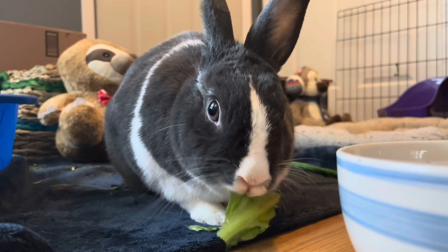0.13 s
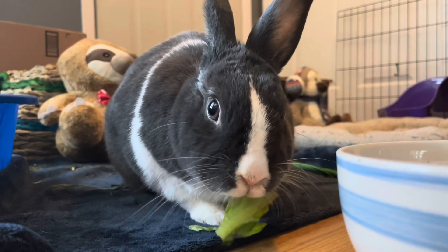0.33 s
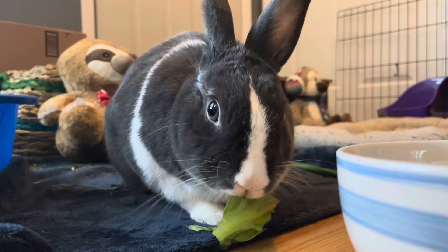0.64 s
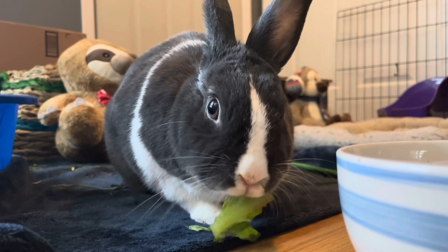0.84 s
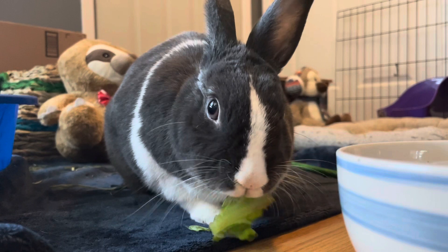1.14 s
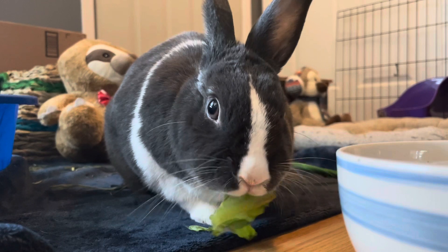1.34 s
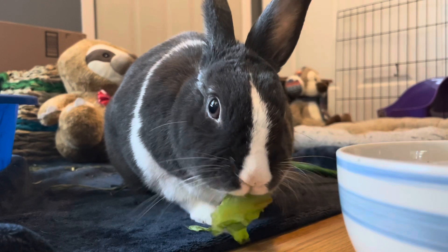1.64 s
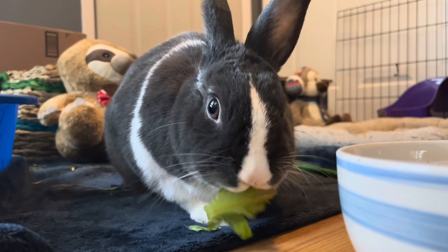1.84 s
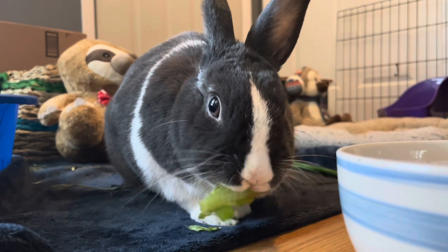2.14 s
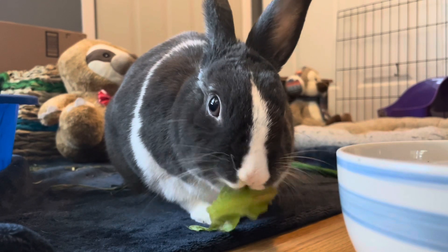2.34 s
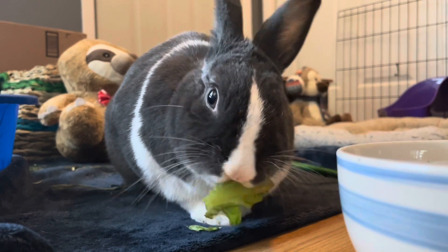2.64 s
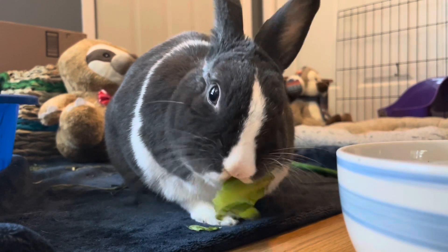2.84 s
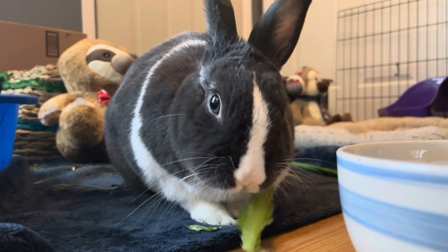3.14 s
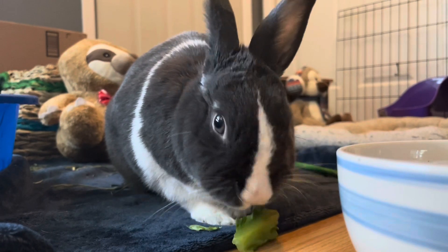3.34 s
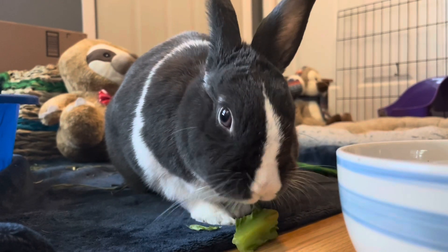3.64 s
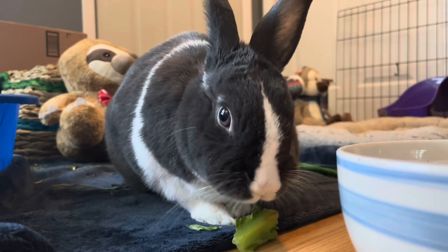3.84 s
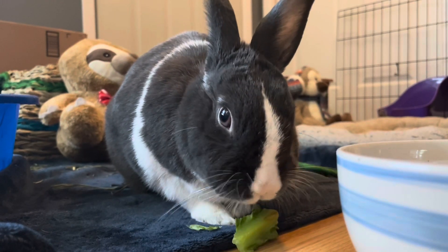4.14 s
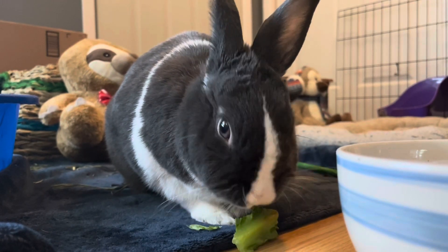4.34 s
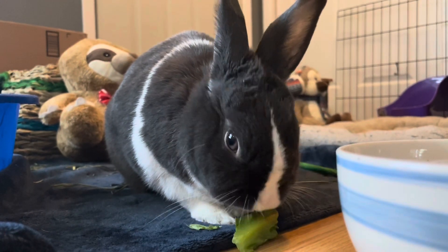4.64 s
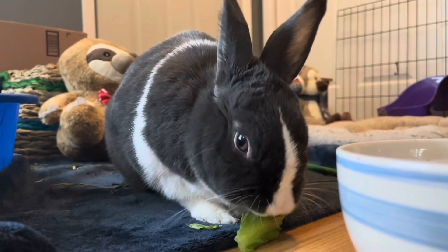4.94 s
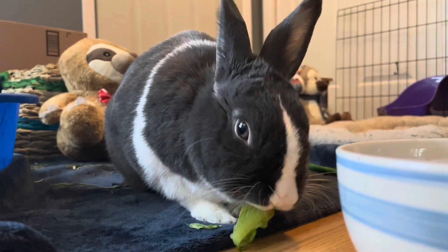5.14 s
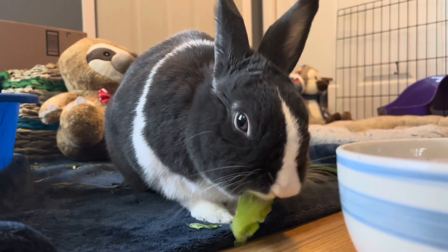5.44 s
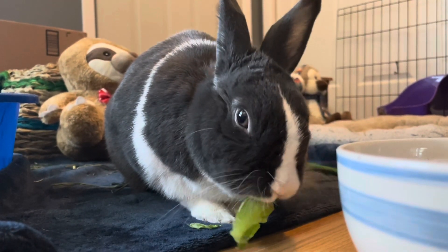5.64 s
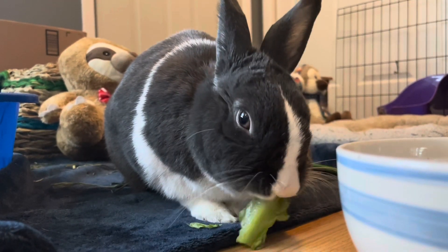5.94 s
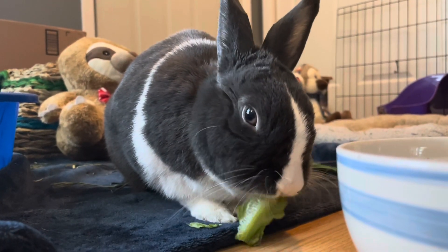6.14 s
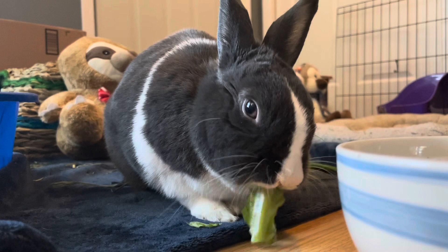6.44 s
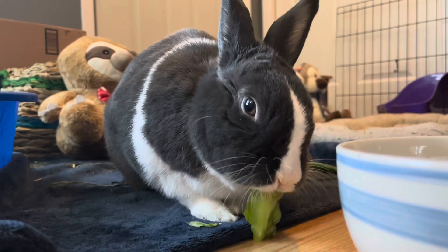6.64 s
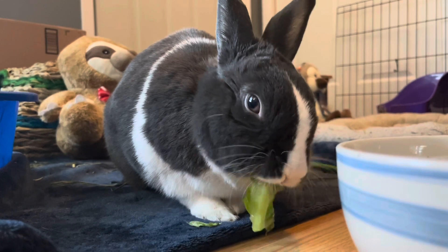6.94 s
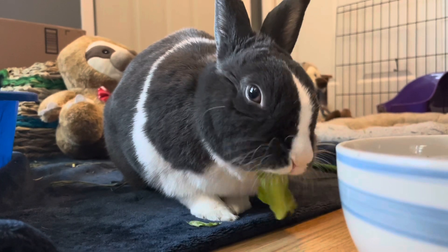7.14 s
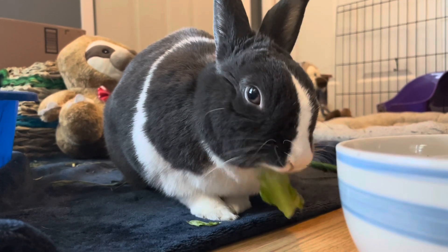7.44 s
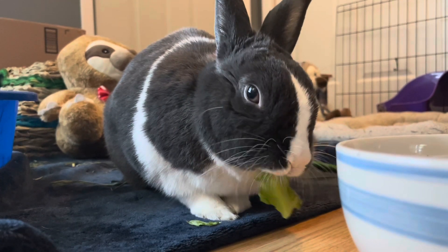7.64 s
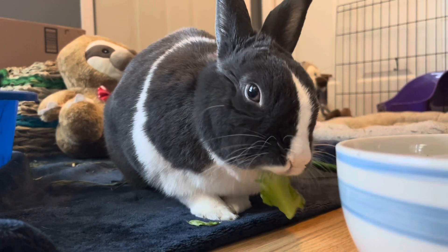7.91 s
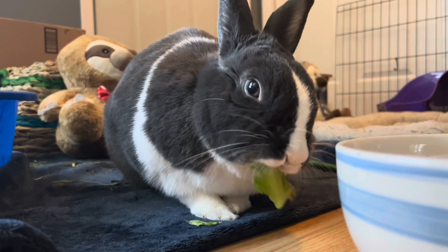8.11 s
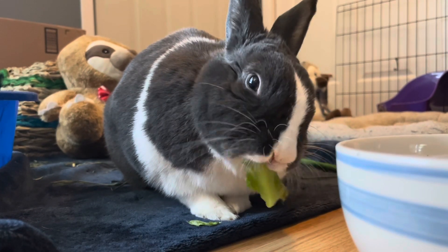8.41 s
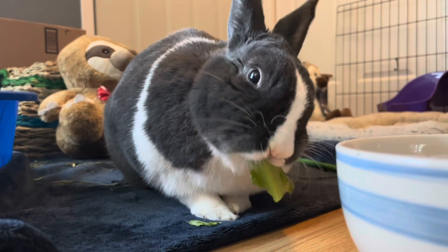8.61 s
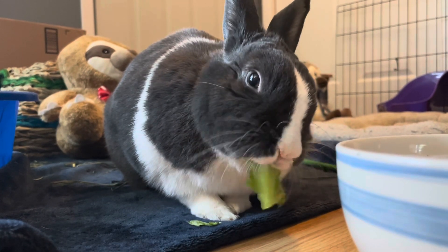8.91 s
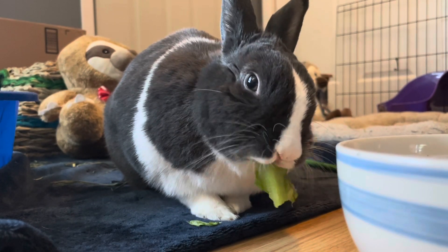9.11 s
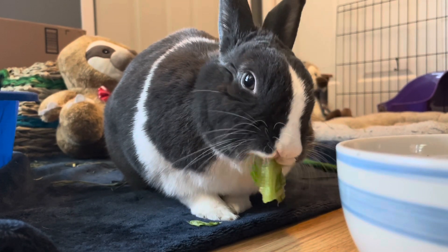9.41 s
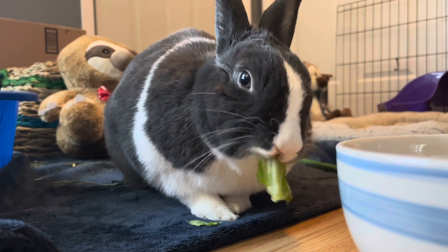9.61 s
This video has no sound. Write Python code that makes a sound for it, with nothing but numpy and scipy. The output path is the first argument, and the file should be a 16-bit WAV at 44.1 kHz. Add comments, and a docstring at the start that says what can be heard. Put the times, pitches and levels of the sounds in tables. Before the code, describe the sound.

Quick, steady chewing of a pet rabbit, heard in stereo from about half a metre away indoors. At first a blanket rustles and the floor thumps softly while the lettuce cracks now and then. After a stretch of muffled grinding, the stalk breaks in a dense run of bright, wet crunches. The room hums low throughout, and muffled distant engines add a falling tone, then a rising one near the end.

```python
"""Crisp crackling and snapping, about four chews a second: a rabbit eats a lettuce leaf half a metre from
a phone on the floor. Cells burst and ribs break in the leaf, the molars grind, the jaw knocks dully.
A blanket rustles nearby and soft thumps come through the boards. The house hums, and beyond the walls
one engine slows down and later another speeds up. Stereo, from the phone's two microphone ports."""
import sys
import numpy as np
from scipy import signal
from scipy.fft import rfft, irfft, next_fast_len
from scipy.io import wavfile
from scipy.ndimage import uniform_filter1d

SR = 44100
rng = np.random.default_rng(int(sys.argv[2]) if len(sys.argv) > 2 else 0)


def int16_out(signal):
    """Quantize to a 16-bit WAV file."""
    q = np.round(np.clip(np.atleast_2d(signal).T, -1, 1) * 32767)
    wavfile.write(sys.argv[1], SR, q.astype(np.int16))


N = 430857
TIME = np.arange(N) / SR
FFT_SIZE = next_fast_len(N + SR)

# tone of the bursting leaf, the molars and the jaw bone, close up: (frequency [Hz], gain [dB])
LEAF_TONE = [(5000, -16), (7000, -16), (8500, -0.5), (10000, 2), (11800, 5.5), (13000, -3.5), (15000, -11),
             (16300, -33.5)]
MOLAR_TONE = [(600, -3), (1300, -3.5), (2250, 0), (2800, 3.5), (3400, 4.5), (4500, 1), (5400, -6.5),
              (6300, -0.5), (8000, -9)]
JAW_TONE = [(250, -24), (500, -4), (740, -3.5), (880, 4.5), (1000, -7.5), (1150, -8.5), (1500, -16.5),
            (2200, -18.5), (3200, -24)]
# treble phase between the microphone ports, shared by rabbit and room: (frequency [Hz], left lead [rad])
PORTS_TOP = [(6800, 4.6), (7900, 3.25), (9200, 2.95), (10000, 2.3), (12060, 1.), (13100, 0)]


def chewing():
    """Leaf cells burst, the molars grind the pulp, and the jaw bone sounds along."""
    # jaw presses, two or three on a stiff rib: (time [s], length [s], leaf level [dB], jaw level [dB])
    chews = [(0.187, 0.089, -70, -54), (0.439, 0.087, -78, -63), (0.746, 0.09, -74, -55),
             (0.971, 0.075, -70, -58), (1.269, 0.056, -65, -61), (1.571, 0.031, -64, -56),
             (1.801, 0.039, -49, -52), (2.079, 0.026, -51, -72), (2.328, 0.12, -72.5, -70),
             (2.618, 0.064, -60.5, -69), (2.807, 0.14, -67, -81), (3.03, 0.12, -74.5, -69),
             (3.303, 0.046, -80.5, -59), (3.54, 0.042, -77.5, -59.5), (3.783, 0.038, -81, -64.5),
             (4.038, 0.041, -80, -60), (4.293, 0.046, -80, -58.5), (4.545, 0.049, -82.5, -60),
             (4.811, 0.039, -84, -65), (5.01, 0.031, -60.5, -71), (5.17, 0.093, -55, -59.5),
             (5.47, 0.0061, -47.5, -49), (5.52, 0.02, -57, -59), (5.675, 0.082, -62.5, -65.5),
             (5.928, 0.067, -54, -60.5), (6.157, 0.066, -60.5, -58), (6.265, 0.017, -52, -60),
             (6.433, 0.12, -57.5, -58.5), (6.733, 0.08, -52.5, -64), (7.017, 0.096, -52, -68.5),
             (7.24, 0.063, -63.5, -66.5), (7.284, 0.048, -49, -66.5), (7.494, 0.094, -68.5, -65.5),
             (7.75, 0.074, -65, -61.5), (8.007, 0.087, -54.5, -64), (8.271, 0.086, -48.5, -60),
             (8.564, 0.073, -51, -61.5), (8.834, 0.069, -56, -60), (9.08, 0.042, -65, -69),
             (9.131, 0.06, -51.5, -57.5), (9.392, 0.067, -47.5, -57), (9.662, 0.045, -50.5, -57)]
    # the freshly gripped stalk squirts juice in a narrow high band: (time [s], gain [dB])
    squirts = [(4.9, -3), (5.2, -1), (5.9, -10), (6.28, 10), (6.5, -0.5), (6.8, -13)]
    crisp_db, juice_hz, juice_width_hz, jaw_lag_s = -69, 5350, 600, .008
    start, length, leaf_db, jaw_db = np.transpose(chews)
    grind_db = -64.5 + 0.71 * (leaf_db + 60) + 0.32 * (jaw_db + 60)  # louder on crisp leaf and hard bites
    rise = np.where(leaf_db > crisp_db, 4000, 652)  # soft bites set in gently
    bites = strokes(start, length, [leaf_db, grind_db, jaw_db], rise, fall_db_s=587, fade_db=4)
    crisp = np.clip(bites[0] / undb(crisp_db), 0, 1)
    leaf, molars, jaw = undb(2.5 * crisp * walk(70)) * bites  # crisp leaf gives way in jerks
    cells = leaf * crackle(per_s=1100, scatter_db=3.5, burst_ms=0.56)
    grit = crackle(per_s=650, scatter_db=3.4, burst_ms=0.45)
    knocks = crackle(per_s=300, scatter_db=2, burst_ms=3)
    rub = level(lowpass(rng.standard_normal(N), hz=1300), db=3)  # well-chewed pulp only rubs, dully
    pulp = (crisp * grit + np.sqrt(1 - crisp ** 2) * rub) * molars
    lag = int(jaw_lag_s * SR)
    jaw = uniform_filter1d(jaw, lag, origin=(lag - 1) // 2)  # the jaw answers a little late
    juice_band = signal.iirpeak(juice_hz, juice_hz / juice_width_hz, SR)
    juice = 5 * signal.lfilter(*juice_band, crisp * pulp * undb(along(squirts)[0]))
    wetness = undb(-22.5) * uniform_filter1d(bites[0], SR // 2)  # tiny smacks go on between bites
    smacks = wetness * crackle(per_s=45, scatter_db=3.5, burst_ms=.3)
    grinding = colour(pulp + juice + smacks / 2, MOLAR_TONE)
    return colour(cells + smacks, LEAF_TONE) + grinding + colour(knocks * jaw, JAW_TONE)


def leaf_snaps():
    """A rib cracks and tears on briefly: a crisp top, a body ringing in the mouth, a knock in the jaw."""
    # snapping ribs and faint wet ticks: (time [s], top peak [dB], body peak [dB], body pitch [Hz])
    ribs = [(0.3935, -57, -53, 970), (0.62, -59, -50.5, 1760), (1.041, -36, -40, 3050),
            (1.8215, -16.5, -32.5, 3700), (1.8446, -34, -41, 1997), (2.346, -38, -45, 2017),
            (2.359, -33.5, -33, 5000), (2.3744, -26.5, -29, 3920), (2.385, -34, -32, 2210),
            (2.662, -36, -46.5, 4135), (2.8409, -33, -49, 1810), (5.0349, -34, -30.5, 2730),
            (5.173, -28.5, -31, 5160), (5.209, -35, -35.5, 2900), (5.251, -42, -36.5, 1210),
            (5.332, -59, -42, 2580), (5.4432, -30.5, -33, 2960), (5.4779, -37, -34, 1440),
            (5.493, -51, -39.5, 800), (5.525, -26.5, -41.5, 5150), (5.6888, -34.5, -47, 1860),
            (5.9477, -43, -44, 3000), (6.1865, -28.5, -32, 4030), (6.234, -31, -33, 1420),
            (6.267, -34, -48, 6000), (6.2789, -32, -45, 5900), (6.335, -69, -44.5, 4900),
            (6.444, -33.5, -39, 6100), (6.461, -25, -34.5, 5550), (6.4811, -24.5, -34, 5600),
            (6.5036, -33, -34.5, 1900), (6.522, -41, -45, 4500), (6.54, -27, -44, 1720),
            (6.5637, -27.5, -38, 3850), (6.7436, -48, -37, 2160), (7.026, -30, -39, 3400),
            (7.043, -27.5, -44, 3940), (7.2993, -27, -63, 3790), (7.3174, -21, -40.5, 3870),
            (8.032, -46, -36.5, 1900), (8.0614, -18.5, -38.5, 4300), (8.17, -49, -55.5, 1900),
            (8.2922, -27, -33, 3970), (8.348, -26, -38.5, 6330), (8.4694, -64, -49, 1900),
            (8.5702, -29, -38.5, 1480), (8.5765, -38, -37, 650), (8.619, -49, -43, 700),
            (8.6623, -29, -38, 5930), (8.6759, -23.5, -41, 2150), (8.81, -43, -56, 1720),
            (8.841, -30, -40, 1725), (8.858, -40, -39, 2020), (9.0797, -42, -48.5, 2200),
            (9.133, -50, -42, 751), (9.1373, -23.5, -31.5, 4160), (9.191, -31, -44, 6250),
            (9.307, -58, -50, 1850), (9.394, -48, -36, 760), (9.403, -27, -38, 860),
            (9.4428, -22, -40, 1127), (9.458, -30, -36, 4300), (9.667, -28.5, -40, 1730),
            (9.7027, -19.5, -57, 5804), (9.7107, -25, -53, 4000)]
    # single cells that pop with hardly any body: (time [s], top peak [dB])
    pops = [(.437, -46), (1.021, -37.5), (1.815, -34.5), (1.8358, -27), (1.9018, -43), (2.081, -36),
            (2.3517, -34), (2.6507, -36), (2.875, -46), (3.25, -51), (4.0705, -54), (6.177, -37),
            (6.2056, -36), (6.4153, -51), (6.6998, -40.5), (6.963, -50), (7.0023, -46), (7.0501, -26),
            (7.06, -31), (7.0904, -41), (7.2908, -25), (7.973, -43.5), (8.007, -29), (8.5912, -34),
            (8.6407, -33), (9.4168, -29), (9.63, -44), (9.6728, -34), (9.682, -23.5)]
    crack_s, onset_s, tear_s, tear_db = .00045, .0001, .004, -25
    out, knocks = np.zeros((2, N + 1500))
    t = TIME[:1000]
    crack = np.exp(-t / crack_s) * (1 - np.exp(-t / onset_s))
    envelope = crack + undb(tear_db) * np.exp(-t / tear_s)
    leaf, molars = (colour(np.ones(1), tone)[:500] for tone in (LEAF_TONE, MOLAR_TONE))
    breaks = ribs + [(start, db, db - 28, 4000) for start, db in pops]
    for start, top_db, body_db, hz in breaks:
        i = int(start * SR)
        top_puff, body_puff = envelope * np.sign(rng.standard_normal((2, len(t))))
        ring_s, ring_gain = .003 * (800 / hz) ** 1.5, undb(-1) * 800 / hz  # shorter and weaker higher up
        mode = np.sin(2 * np.pi * hz * t) * np.exp(-t / ring_s)
        ring = ring_gain * np.convolve(body_puff, mode / np.linalg.norm(mode))[:len(t)]
        top = np.convolve(top_puff, leaf)
        body = np.convolve(body_puff + ring, molars)
        for part, db in (top, top_db), (body, body_db):
            out[i:i + len(part)] += undb(db) * part / np.abs(part).max()
        knocks[i] += undb(body_db + 5 - 6 * np.log2(hz / 2000))  # low snaps knock the jaw harder
    return out[:N] + colour(knocks[:N], JAW_TONE)


def blanket():
    """Nearby, folds shift and fibres slip in uneven runs; each drag has its own hollow and rasp."""
    # cloth dragged over cloth: (time [s], length [s], folds [dB], fibres [dB], hollow [Hz], rasp [Hz])
    drags = [(0.758, 0.034, -42, -54.5, 734, 3530), (0.849, 0.36, -62.5, -77, 797.7, 3200),
             (1.201, 0.038, -47, -62, 448, 2486), (1.332, 0.026, -44.5, -65, 401.8, 2483),
             (1.423, 0.16, -59.5, -68.5, 500, 2509), (1.572, 0.026, -41.5, -51.5, 498, 1495),
             (1.639, 0.051, -48.5, -58, 450.8, 2834), (1.858, 0.029, -52.5, -52, 800, 2704),
             (2.029, 0.1, -53, -61.5, 498, 1482), (2.2, 0.038, -48.5, -58.5, 348, 4716),
             (2.84, 0.073, -56.5, -65.5, 495, 1305), (4.097, 0.024, -76, -68, 599, 4360),
             (4.326, 0.13, -66.5, -69, 600, 2690)]
    # tone of the soft folds and of the scraping fibres: (frequency [Hz], gain [dB])
    fold_tone = [(50, 7.5), (85, 2), (170, 5.5), (360, 5), (560, -0.5), (760, 3.5), (1050, -6.5),
                 (1500, -10.5), (2600, -31.5)]
    fibre_tone = [(1200, -9), (1800, 0.5), (2900, 2), (5000, -3.5), (6500, -9), (11000, -9.5), (13000, -45)]
    start, length, folds_db, fibres_db, hollow_hz, rasp_hz = np.transpose(drags)
    folds, fibres = strokes(start, length, [folds_db, fibres_db],
                            rise_db_s=np.full(len(start), 1400), fall_db_s=172, fade_db=-0.5)
    slip = undb(1.44 * walk(60))
    noise = rng.standard_normal(N)
    hollow = undb(-3) * folds * resonance(start, hollow_hz, width_hz=80)
    rasp = undb(-2) * fibres * resonance(start, rasp_hz, width_hz=350)
    return slip * (colour(folds * noise, fold_tone) + colour(fibres * noise, fibre_tone) + hollow + rasp)


def floor_thumps(decay_s=0.063):
    """The floor boards swing a few cycles."""
    # soft thumps through the floor: (time [s], level [dB], pitch [Hz])
    thumps = [(1.221, -39.5, 77.35), (1.329, -40.5, 91.7), (1.601, -42, 88.5), (2.121, -43.5, 79.4),
              (4.021, -40.5, 65.3), (7.616, -43, 143.8), (8.482, -45, 132.7)]
    out, t = np.zeros(N + SR), TIME[:SR // 4]
    for start, db, hz in thumps:
        i = int(start * SR)
        out[i:i + len(t)] += undb(db) * np.sin(2 * np.pi * hz * t) * np.exp(-t / decay_s)
    return out[:N]


def slowing_engine(rattle_hz=126.2, rattle_width_hz=5.4, rattle_db=-49.5):
    """An engine outside sags ever faster; something indoors rings as its second harmonic sweeps past."""
    # its fundamental, heard indoors: (time [s], level [dB])
    loudness = [(2.75, -68), (2.95, -56), (3.3, -55), (3.6, -47.5), (3.85, -56), (4.15, -73), (4.35, -53),
                (4.72, -46.5), (5.15, -61)]
    t = np.clip(TIME - loudness[0][0], 0, loudness[-1][0] - loudness[0][0])
    firing_hz = 80.6 - 8 * t - 2.9 * t ** 2
    detuning = (2 * firing_hz - rattle_hz) / rattle_width_hz
    ring_db = rattle_db - 10 * np.log10(1 + detuning ** 6)
    return engine(loudness, firing_hz, [along(loudness)[0], ring_db])


def speeding_engine():
    """Another engine speeds up and nears; each harmonic is as loud as the walls let it through."""
    # its approach: (time [s], firing rate [Hz], level [dB])
    approach = [(7.2, 29.93, -83), (7.69, 36.1, -56.5), (8.31, 43.45, -61), (8.78, 58.32, -49.5),
                (9.12, 70.85, -48.5), (9.4, 79.33, -40.5), (9.77, 93.4, -51)]
    # harmonics 1-5 of the firing rate: (gain [dB])
    harmonics = [0, -2.5, -0.5, -9, -18]
    # what the walls and the room let through: (frequency [Hz], gain [dB])
    walls = [(52, -0.5), (66, 3), (79, 1), (86.5, -16), (92, 9), (112, 4), (138, 10), (165, -11),
             (195, -27), (250, 1), (285, -10.5), (340, -17.5), (425, 7)]
    firing_hz, db = along(approach)
    indoors_db = [db + gain + across(walls, k * firing_hz) for k, gain in enumerate(harmonics, 1)]
    return engine(approach, firing_hz, indoors_db)


def engine(curve, firing_hz, harmonics_db):
    """Wavering harmonics of a slightly unsteady firing rate, sounding over the time span of the curve."""
    phase = 2 * np.pi * np.cumsum(firing_hz * (1 + 0.0046 * walk(10))) / SR
    audible = uniform_filter1d(1. * (TIME > curve[0][0]) * (TIME < curve[-1][0]), SR // 10)
    return audible * sum(undb(db + 1.92 * walk(25)) * np.sin(k * phase)
                         for k, db in enumerate(harmonics_db, 1))


def mains_hum(hz=117.7, db=-58):
    """The mains hum in the house: one low tone whose level drifts."""
    return undb(db + 0.92 * walk(2.7)) * np.sin(2 * np.pi * hz * TIME)


def room_tone(rumble_db=-54.5, hiss_db=-78):
    """Distant house rumble that swells slowly, and the hiss of the microphone."""
    # tone of the rumble and of the hiss: (frequency [Hz], gain [dB])
    rumble_tone = [(26, -10.5), (59, 2), (128, -1), (197, -7.5), (251, -8), (417, -14.5), (839, -19.5),
                   (1070, -31), (1860, -35), (3400, -40.5), (4760, -42), (7000, -45), (9100, -89.5)]
    hiss_tone = [(5500, -28), (7000, -11), (9400, 2.5), (12300, 2), (13200, -27)]
    rumble = colour(rng.standard_normal(N), rumble_tone) * undb(rumble_db + 0.8 * walk(2.2))
    hiss = colour(rng.standard_normal(N), hiss_tone) * undb(hiss_db + 1.2 * walk(8))
    return rumble + hiss


def crackle(per_s, scatter_db, burst_ms):
    """Cells that burst at random: short decaying puffs of noise, a few far louder than the rest."""
    bursts = rng.random(N) < per_s / SR
    energy = bursts * undb(2 * scatter_db * np.minimum(rng.exponential(size=N), 4))
    fade = np.exp(-np.arange(800) / (burst_ms * SR / 1000))
    envelope = np.sqrt(np.abs(signal.fftconvolve(energy, fade)[:N]))
    return level(envelope * rng.standard_normal(N), 0)


def strokes(starts, lengths, layers_db, rise_db_s, fall_db_s, fade_db):
    """One loudness curve a layer: each stroke sets in, slopes by fade_db over its length and lets go."""
    gains = np.zeros((len(layers_db), N))
    for start, length, levels_db, rise in zip(starts, lengths, np.transpose(layers_db), rise_db_s):
        span = slice(max(int((start - .1) * SR), 0), int((start + length + .3) * SR))
        t = TIME[span] - start
        db = fade_db * (.5 - np.clip(t / length, 0, 1))
        db += rise * np.minimum(t, 0) - fall_db_s * np.maximum(t - length, 0)
        gains[:, span] += undb(levels_db[:, None] + db)
    return gains


def resonance(starts, hz, width_hz):
    """Noise in one band whose centre steps to a new pitch just before each start and wanders a little."""
    current = np.maximum(np.searchsorted(starts, TIME + .02) - 1, 0)
    centre_hz = hz[current] * (1 + .04 * walk(15))
    slow = signal.lfilter([1], [1, -np.exp(-np.pi * width_hz / SR)], rng.standard_normal((2, N)))
    phase = 2 * np.pi * np.cumsum(centre_hz) / SR
    return level(slow[0] * np.cos(phase) + slow[1] * np.sin(phase), 0)


def reflections(x, t60_s, db):
    """A decaying scatter of echoes, without the direct sound."""
    t = TIME[:SR // 2]
    tail = rng.standard_normal(len(t)) * undb(-60 * t / t60_s)
    return signal.fftconvolve(x, undb(db) * tail / np.linalg.norm(tail))[:N]


def ports(sound, unrelated, lead, likeness, shadow=((1, 0),)):
    """Two microphone ports: the right one lags, and hears the unrelated sound where likeness is low."""
    left = rfft(sound, FFT_SIZE)
    right = likeness * left + np.sqrt(1 - likeness ** 2) * rfft(unrelated, FFT_SIZE)
    turn = np.exp(.5j * across(lead)) * undb(across(shadow) / 2)
    return irfft([left * turn, right / turn], FFT_SIZE)[:, :N]


def colour(x, tone, size=16384):
    """Minimum-phase filter of unit power with the gains of the table, falling off beyond its ends."""
    closed = [(tone[0][0] / 2, tone[0][1] - 40), *tone, (tone[-1][0] * 1.2, tone[-1][1] - 40)]
    gain = undb(across(closed, np.arange(size // 2 + 1) * SR / size))
    cepstrum = irfft(np.log(level(gain, 0)), size)
    cepstrum[1:size // 2] *= 2
    cepstrum[size // 2 + 1:] = 0
    return signal.oaconvolve(x, irfft(np.exp(rfft(cepstrum)), size))[:N]


def lowpass(x, hz):
    return signal.lfilter(*signal.butter(1, hz, fs=SR), x)


def walk(per_s):
    """Random values joined by straight ramps; spread near 1."""
    hold = int(SR / per_s)
    return 1.55 * uniform_filter1d(np.repeat(rng.standard_normal(N // hold + 1), hold), hold)[:N]


def across(table, hz=np.arange(FFT_SIZE // 2 + 1) * SR / FFT_SIZE):
    """A (frequency [Hz], value) table read on a log-frequency axis."""
    table_hz, values = np.transpose(table)
    return np.interp(np.log(hz + 1e-9), np.log(table_hz), values)


def along(curve):
    """The columns of a curve in time, one value a sample."""
    times, *columns = np.transpose(curve)
    return [np.interp(TIME, times, column) for column in columns]


def undb(db):
    return 10 ** (np.asarray(db) / 20)


def level(x, db):
    return x * undb(db) / np.sqrt(np.mean(x ** 2))


def scene():
    """From the floor: the rabbit close, blanket and room all around, the low sounds near the centre."""
    # phase between the ports, for the rabbit and for the room: (frequency [Hz], left lead [rad])
    near_lead = [(300, 0), (1200, .9), (2000, .5), (2600, 1.3), (3300, 2.4), (3950, 4.6), (4650, 5.9),
                 (5340, 6.8), (5700, 4.8)] + PORTS_TOP
    room_lead = [(600, 0.62), (1500, 2.6)] + PORTS_TOP
    # how alike the ports hear the room: (frequency [Hz], likeness [0-1])
    likeness = [(60, 0.83), (250, 0.81), (600, 0.46), (1500, 0.16), (6800, 0), (8000, 1), (13000, 0.97)]
    # how the phone's body shades the ports: (frequency [Hz], left minus right [dB])
    shadow = [(700, -1.5), (1700, 11), (2400, 0.5), (4600, -2), (5400, -3.5), (6100, -9), (6800, 8.5),
              (9000, 0.5)]
    rabbit = chewing() + leaf_snaps()
    low = mains_hum() + floor_thumps() + slowing_engine() + speeding_engine()
    dull = lowpass(rabbit, hz=4500)  # soft furnishings swallow the treble
    room = [reflections(dull, t60_s=0.16, db=-13) + blanket() + room_tone() for _ in range(2)]
    early = reflections(rabbit, t60_s=0.07, db=0)  # floor and bowl send one port its own reflections
    near = ports(rabbit, early, near_lead, likeness=0.95, shadow=shadow)
    around = ports(*room, room_lead, across(likeness))
    return near + around + ports(low, low, lead=[(50, 0.091), (250, 0.61)], likeness=1)


def record(dry, top_hz=16500):
    """The phone cuts the top steeply."""
    return signal.sosfilt(signal.ellip(10, .2, 80, top_hz, fs=SR, output="sos"), dry)


dry = scene()
out = record(dry)
int16_out(out)
```